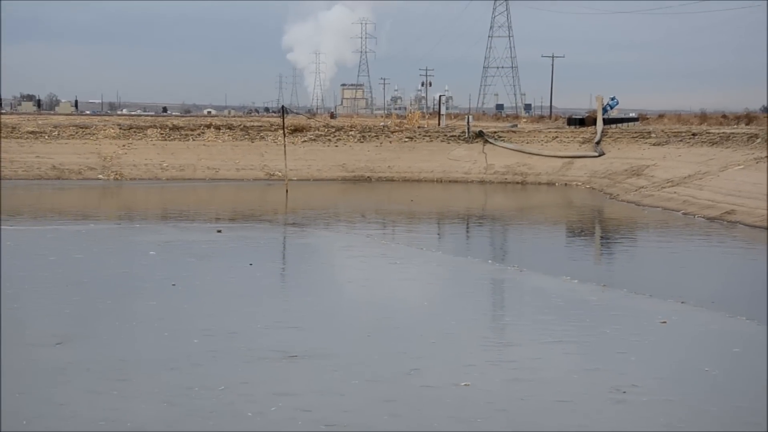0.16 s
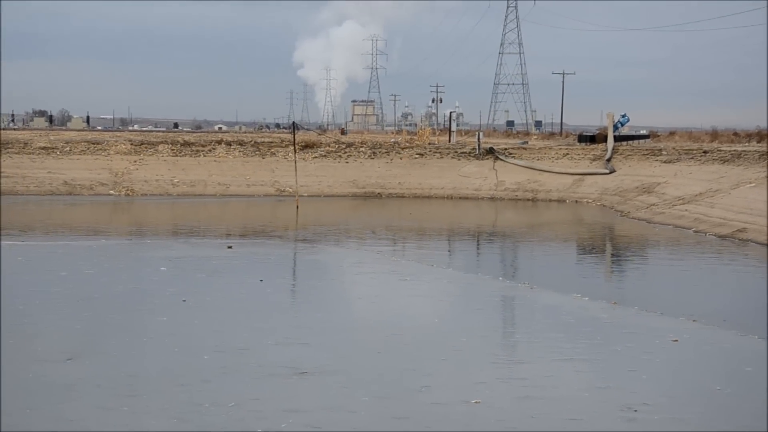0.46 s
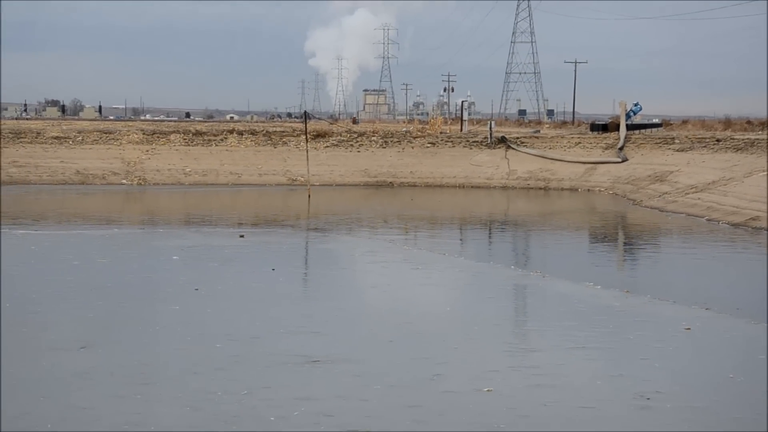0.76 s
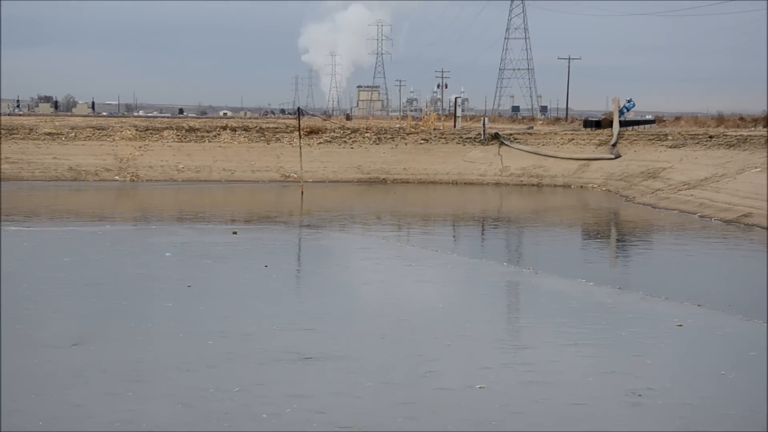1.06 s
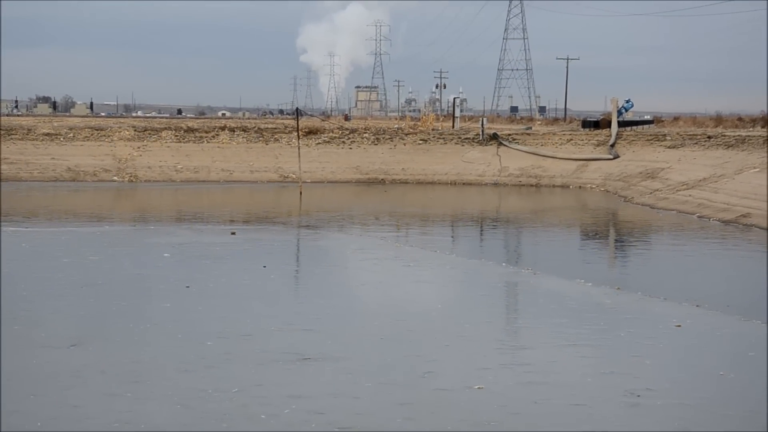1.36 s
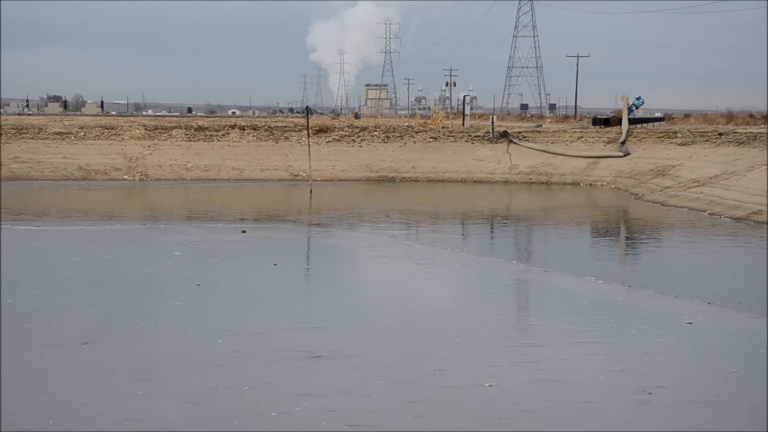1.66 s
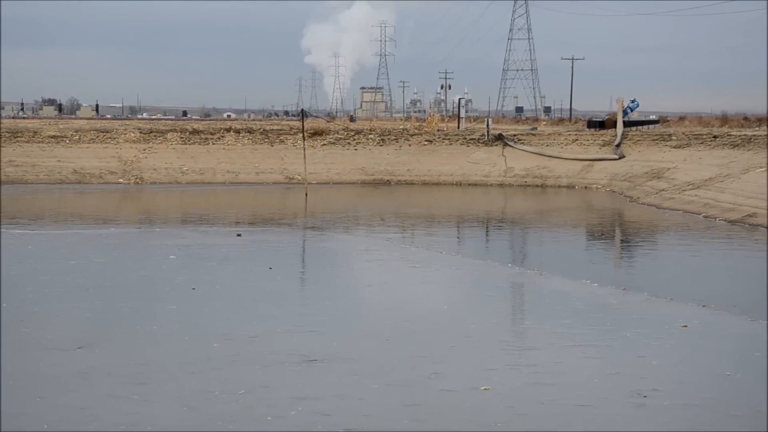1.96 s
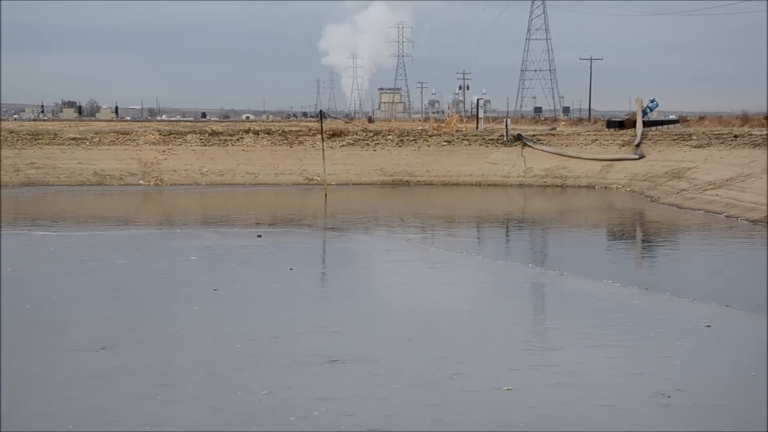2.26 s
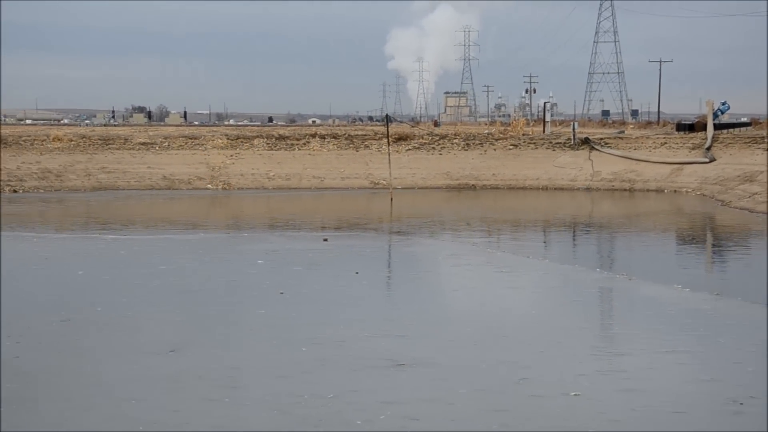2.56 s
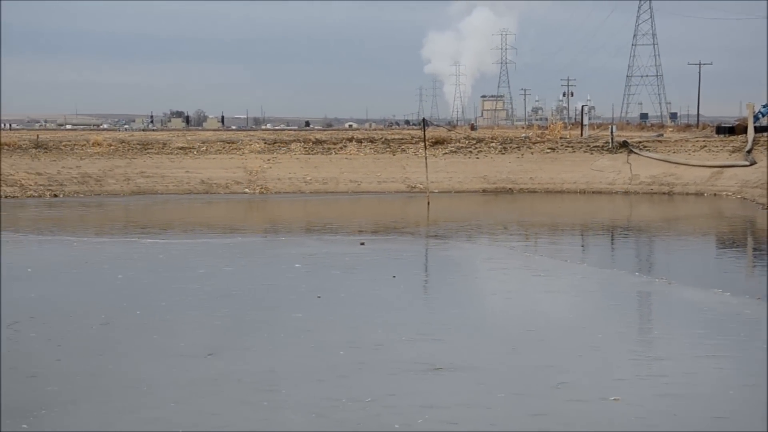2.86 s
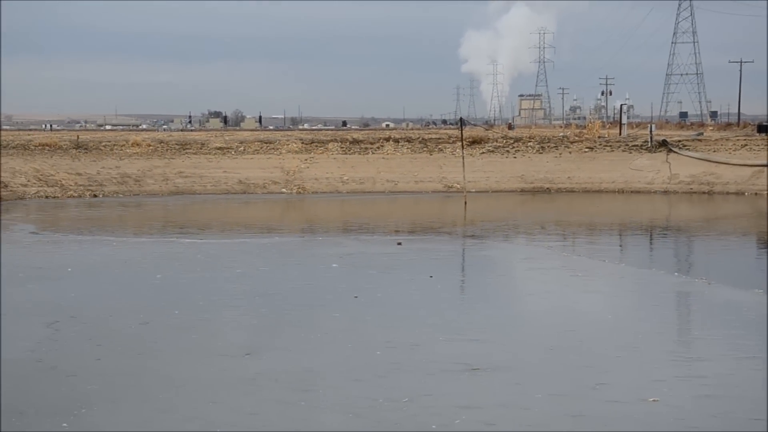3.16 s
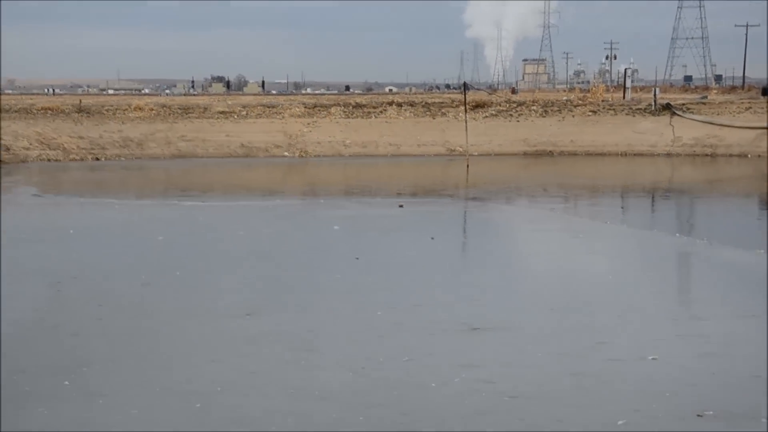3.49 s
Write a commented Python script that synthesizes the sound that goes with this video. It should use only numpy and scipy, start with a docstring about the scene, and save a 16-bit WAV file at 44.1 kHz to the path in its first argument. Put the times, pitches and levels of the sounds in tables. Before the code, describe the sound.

A stone skips away across a frozen pond, ringing out rapid bird-like chirps, then a loud close crack.

```python
"""A stone skips away over a thin frozen pond. Each bounce sends a bending wave through the ice that outruns
the sound in the air: a 2 kHz note and a falling chirp arrive first, and the tick of the contact cuts them off.
Feet shift, a sleeve swishes (thuds and grainy noise), and a second stone cracks onto the ice close by (swept
notes and noise), overloading the microphone. Low rumble and steady distant noise lie under it all."""
import sys
import numpy as np
from scipy import signal
from scipy.fft import rfft, irfft
from scipy.io import wavfile
from scipy.ndimage import map_coordinates

SR = 44100
rng = np.random.default_rng(int(sys.argv[2]) if len(sys.argv) > 2 else 0)


def unload_wav(signal):
    """Save mono or channel-first audio to the path in sys.argv[1] as 16-bit WAV at rate SR, clipped to [-1, 1]."""
    wavfile.write(
        sys.argv[1],
        SR,
        np.round(np.clip(np.atleast_2d(signal).T, -1, 1) * 32767).astype(np.int16),
    )


N = 160083


def amp(db):
    """Decibels to gain."""
    return 10 ** (np.asarray(db) / 20)


def curve(x, table, axis=1):
    """Straight lines through one column of a table."""
    table = np.array(table, float)
    return np.interp(x, table[:, 0], table[:, axis])


def gain_at(hz, points):
    """Gain of a spectrum of (frequency [Hz], level [dB]) points, on a log frequency axis."""
    points = np.array(points, float)
    return amp(np.interp(np.log(np.maximum(hz, 1)), np.log(points[:, 0]), points[:, 1]))


def colour(x, points, keep_power=True):
    """Causal minimum-phase filter with the given spectrum, by folding the cepstrum."""
    size = 4096
    cepstrum = irfft(np.log(gain_at(np.fft.rfftfreq(size, 1 / SR), points)))
    cepstrum[1:size // 2] *= 2
    cepstrum[size // 2 + 1:] = 0
    response = irfft(np.exp(rfft(cepstrum)))
    if keep_power:
        response = response / np.sqrt(np.sum(response ** 2))
    return signal.fftconvolve(x, response)


def noise(points):
    """Steady coloured noise of unit level."""
    return colour(rng.standard_normal(N), points)[:N]


def walk(count, rate_hz):
    """Smooth random drift with a spread near 1."""
    at = np.arange(count) * rate_hz / SR
    knots = rng.standard_normal(int(at[-1]) + 3)
    return map_coordinates(knots, [at], order=2, mode="nearest")


def fade(t60_s):
    """Exponential decay down to -60 dB."""
    t = np.arange(int(t60_s * SR) + 2) / SR
    return np.exp(-np.log(1000) * t / t60_s)


def burst(t60_s):
    """Dying white noise."""
    env = fade(t60_s)
    return env * rng.standard_normal(len(env))


def sine(hz):
    """A tone that follows a pitch curve."""
    return np.sin(2 * np.pi * np.cumsum(hz) / SR)


def add(out, at_s, x):
    """Mix x in from a given time on, trimmed to the scene."""
    i = int(round(at_s * SR))
    x = x[max(-i, 0):max(N - i, 0)]
    out[max(i, 0):max(i, 0) + len(x)] += x


def scatter(x, t60_s):
    """A diffuse noise tail with about the same energy as the sound."""
    tail = burst(t60_s)
    return signal.fftconvolve(x, tail / np.linalg.norm(tail))[:N]


# wind and handling rumble: (time [s], level [dB])
RUMBLE_LEVEL = [(0, -59), (3.039, -56.5), (3.09, -46.5), (3.63, -45)]
# rumble spectrum: (frequency [Hz], level [dB])
RUMBLE_SPECTRUM = [(20, -7.5), (100, 1.5), (220, -3), (600, -22.5), (1500, -51)]
# distant noise spectrum: (frequency [Hz], level [dB])
AIR_SPECTRUM = [(30, -2), (150, 3.5), (400, -4.5), (1500, -11.5), (3000, -22), (4800, -27), (12000, -33.5),
                (16000, -39)]
AIR_DB = -52


def outdoors():
    """Steady distant noise, and a rumble that grows as the hand moves."""
    rumble_db = curve(np.arange(N) / SR, RUMBLE_LEVEL) + 0.77 * walk(N, 10)
    rumble = noise(RUMBLE_SPECTRUM) * amp(rumble_db)
    air = noise(AIR_SPECTRUM) * amp(AIR_DB + .5 * walk(N, 4.3))
    return rumble + air


# ice along the path, thicker ice sings lower: (distance from listener [m], pitch [Hz], level [dB])
ICE_PATH = [(0, 1900, -7), (1, 2030, 3), (2.1, 2080, -6), (3.4, 2110, -1), (12, 2165, 1), (19, 2160, 1),
            (25, 2030, 2), (28, 1930, -1)]
LEAD_S_PER_M = .0017  # gain of the ice wave on the sound in the air
LOSS_DB_PER_M = 0.2767  # damping of the ice wave over that lead
NOTE_WOBBLE, NOTE_ROUGH_DB, NOTE_FUZZ = .012, 1.6, .11  # random pitch, level and fast amplitude


def ice_note(metres, detune):
    """Pitch follows the sheet: ice near the listener sounds first, ice under the stone last."""
    count = int(metres * LEAD_S_PER_M * SR)
    place_m = np.arange(count) / SR / LEAD_S_PER_M
    pitch_hz = curve(place_m, ICE_PATH) * (1 + detune + NOTE_WOBBLE * walk(count, 151.2))
    loss_db = LOSS_DB_PER_M * (metres - place_m)
    level_db = curve(place_m, ICE_PATH, axis=2) - loss_db + NOTE_ROUGH_DB * walk(count, 298.5)
    fuzz = 1 + NOTE_FUZZ * walk(count, 1404.6)
    tone = sine(pitch_hz[::-1])[::-1]  # phase counted back from the tick
    return np.sqrt(2) * amp(level_db) * fuzz * tone, pitch_hz[0]


# chirp spectrum: (frequency [Hz], level [dB])
CHIRP_SPECTRUM = [(750, -22.5), (980, -5.5), (1170, 1), (1380, -7.5), (1580, -21), (1880, -3), (2200, -5)]
CHIRP_DB, CHIRP_PATCHY_DB, CHIRP_ATTACK_S = -9, 3.5, 0.00087
CHIRP_S_PER_M, DISPERSION = .0013, .6  # travel time at its first pitch; speed goes as pitch to this power


def ice_chirp(metres, count, note_hz):
    """Bending waves disperse: high pitches travel faster, so the pitch falls as they arrive."""
    t = np.arange(count) / SR
    falling_hz = note_hz * 1.1 * (1 + t / (metres * CHIRP_S_PER_M)) ** (-1 / DISPERSION)
    level = amp(CHIRP_DB + CHIRP_PATCHY_DB * walk(count, 307)) * gain_at(falling_hz, CHIRP_SPECTRUM)
    return np.sqrt(2) * level * sine(falling_hz) * np.minimum(t / CHIRP_ATTACK_S, 1)


# stone path: (time [s], distance [m], level of the tiny contacts between bounces [dB])
STONE_PATH = [(0, 13.1, -52), (.82, 19, -53), (1.45, 22.8, -50), (2.15, 27, -46), (2.6, 29.5, -50),
              (2.95, 31, -58)]
UNDER_START_HZ, UNDER_END_HZ, UNDER_DB, UNDER_FADE_DB_PER_M = 849, 1037, -7.5, 3


def under_note(metres, count):
    """Lower rising note in the first half of the lead, fading with the stone's distance."""
    half = count // 2
    tone = sine(np.linspace(UNDER_START_HZ, UNDER_END_HZ, half)) * signal.windows.tukey(half, .5)
    level_db = UNDER_DB - UNDER_FADE_DB_PER_M * (metres - STONE_PATH[0][1])
    return np.sqrt(2) * amp(level_db) * np.pad(tone, (0, count - half))


# bounces: (time the tick arrives [s], note level [dB])
STONE_BOUNCES = [(.0303, -31), (.1201, -29.5), (.1733, -35.5), (.2149, -33), (.3156, -28), (.3642, -37),
                 (.4123, -34.5), (.478, -41), (.5012, -38.5), (.528, -41.5), (.6235, -37.5), (.6661, -36.5),
                 (.7287, -37.5), (.8237, -30.5), (.8732, -30.5), (.9374, -37.5), (.9884, -37),
                 (1.0055, -40.5), (1.057, -40), (1.0871, -33), (1.192, -34.5), (1.2043, -34), (1.2687, -42),
                 (1.329, -42), (1.3769, -37.5), (1.4536, -35), (1.6267, -35), (1.6718, -38), (1.7132, -38),
                 (1.7842, -37), (1.808, -40.5), (1.838, -34.5), (1.9164, -37), (1.961, -36.5),
                 (1.9762, -29.5), (1.999, -37.5), (2.1075, -30), (2.121, -33), (2.1685, -32.5),
                 (2.2354, -30), (2.2615, -38.5), (2.3018, -45), (2.435, -38.5), (2.4968, -38), (2.597, -44),
                 (2.6786, -36.5), (2.8176, -38)]
# tick spectrum: (frequency [Hz], level [dB])
TICK_SPECTRUM = [(300, -3), (3000, 11), (4400, -9), (6000, -21), (16000, -48.5)]
TICK_DB = -6  # relative to the note
CONTACT_COUNT, CONTACTS_PER_S, CONTACT_SPREAD_DB, CONTACT_DETUNE = 200, 70, 2, .03
SCATTER_DB, SCATTER_T60_S = -6, .09
BANK_DB, BANK_T60_S = -17, .3


def skipping_stone():
    """Bounces and a patter of contacts, ever farther off; flaws smear the chirps, banks scatter a little."""
    notes, chirps, ticks = np.zeros((3, N))
    for at, db in STONE_BOUNCES:
        add(ticks, at, amp([db + TICK_DB]))
    times = (np.arange(CONTACT_COUNT) + rng.uniform(-1, 1, CONTACT_COUNT)) / CONTACTS_PER_S
    spread_db = CONTACT_SPREAD_DB * rng.standard_normal(CONTACT_COUNT)
    levels_db = curve(times, STONE_PATH, axis=2) + spread_db
    detunes = CONTACT_DETUNE * rng.standard_normal(CONTACT_COUNT)
    calls = [(at, db, 0) for at, db in STONE_BOUNCES] + list(zip(times, levels_db, detunes))
    for at, db, detune in calls:
        metres = curve(at, STONE_PATH)
        note, first_hz = ice_note(metres, detune)
        count = len(note)
        chirp = ice_chirp(metres, count, first_hz) + under_note(metres, count)
        start_s = at - count / SR  # ends at the contact's arrival in air
        add(notes, start_s, amp(db) * note)
        add(chirps, start_s, amp(db) * chirp)
    direct = notes + chirps + colour(ticks, TICK_SPECTRUM)[:N]
    smear = amp(SCATTER_DB) * scatter(chirps, SCATTER_T60_S)
    return direct + smear + amp(BANK_DB) * scatter(direct, BANK_T60_S)


# ticks of grit and clothing: (time [s], level [dB])
GRIT_TICKS = [(.197, -46), (1.703, -33), (1.836, -39), (2.133, -34.5), (3.154, -24), (3.571, -32.5)]
# grit spectrum: (frequency [Hz], level [dB])
GRIT_SPECTRUM = [(500, -10), (2000, 4), (4200, -1), (7000, -4.5), (11000, -18), (16000, -23)]
GRIT_T60_S = 0.0041


def grit_ticks():
    """Very short noise bursts, coloured."""
    grit = np.zeros(N)
    for at, db in GRIT_TICKS:
        add(grit, at, amp(db) * burst(GRIT_T60_S))
    return colour(grit, GRIT_SPECTRUM)[:N]


# rustle of the thrower's clothes: (time [s], level [dB])
RUSTLE_LEVEL = [(1.6, -79), (1.85, -59.5), (2.05, -68), (2.6, -64), (2.79, -51.5), (2.845, -51),
                (2.86, -39), (2.94, -57), (3.28, -55.5), (3.588, -59.5), (3.625, -35)]
# cloth spectrum: (frequency [Hz], level [dB])
CLOTH_SPECTRUM = [(200, 5), (500, 3.5), (1500, 3), (3000, 0.5), (4500, -2), (7000, -5.5), (9500, -12.5),
                  (12000, -20.5), (16000, -21)]
CLOTH_GRAIN_DB, CRACKLES_PER_S, CRACKLE_DB = 3.5, 150, 13


def sleeve():
    """Rubbing cloth: noise with a grainy level and random single-sample crackles."""
    crackle = amp(CRACKLE_DB) * (rng.random(N) < CRACKLES_PER_S / SR)
    level_db = curve(np.arange(N) / SR, RUSTLE_LEVEL) + CLOTH_GRAIN_DB * walk(N, 400)
    rub = rng.standard_normal(N) * (1 + crackle) * amp(level_db)
    return colour(rub, CLOTH_SPECTRUM)[:N]


# feet and hands: (time [s], level [dB], centre [Hz], t60 [s])
SOFT_THUDS = [(2.623, -30.5, 560, 0.048), (2.783, -36, 504, .04), (2.879, -28, 424, 0.025),
              (3.457, -33.5, 446, 0.034), (3.481, -26.5, 209.7, .12), (3.482, -31.5, 657, .06)]
THUD_ATTACK_S = 0.0012


def feet_and_hands():
    """Dull thuds: a decaying tone plus a noise scuff around the same centre."""
    thuds = np.zeros(N)
    for at, db, hz, t60_s in SOFT_THUDS:
        env = fade(t60_s)
        env = env * np.minimum(np.arange(len(env)) / SR / THUD_ATTACK_S, 1)
        scuff = colour(burst(t60_s), [(hz / 4, -12), (hz, 0), (hz * 2, -9), (hz * 20, -62)])
        add(thuds, at, amp(db) * env * sine(np.full(len(env), hz)))
        add(thuds, at, amp(db - 3) * scuff)
    return thuds


# short notes of the close strike: (time [s], length [s], start [Hz], end [Hz], level [dB])
STRIKE_NOTES = [(3.1552, 0.00577, 1700, 2570, 1.5), (3.1556, 0.00453, 1647, 1072, -3.5),
                (3.1584, .0026, 4070, 3700, -9), (3.1606, .0085, 1224, 730, -12.5)]
# crack spectrum: (frequency [Hz], level [dB])
CRACK_SPECTRUM = [(60, -8), (250, -7.5), (700, 4), (2000, -5), (4000, -3.5), (7000, -19), (16000, -44)]
# sheet ring spectrum: (frequency [Hz], level [dB])
RING_SPECTRUM = [(200, -23), (1300, 5.5), (2200, 5), (3200, -11), (16000, -46)]
# echoes from the pond edges: (time [s], length [s], centre [Hz], level [dB])
EDGE_ECHOES = [(3.169, 0.0084, 1800, -26), (3.186, .014, 2000, -28.5), (3.17, 0.16, 1370, -44.5),
               (3.262, 0.024, 1330, -35.5)]
STRIKE_S = 3.156
CRACK_DB, CRACK_T60_S = -12, 0.031
RING_DB, RING_T60_S = -23.5, .2


def close_strike():
    """So near that note and chirp shrink to a few cycles in a crack; the sheet rings, its edges answer."""
    out = np.zeros(N)
    for at, length_s, start_hz, end_hz, db in STRIKE_NOTES:
        count = int(length_s * SR)
        sweep = sine(np.geomspace(start_hz, end_hz, count))
        add(out, at, amp(db) * signal.windows.tukey(count, .7) * sweep)
    add(out, STRIKE_S, amp(CRACK_DB) * colour(burst(CRACK_T60_S), CRACK_SPECTRUM))
    add(out, STRIKE_S, amp(RING_DB) * colour(burst(RING_T60_S), RING_SPECTRUM))
    for at, length_s, hz, db in EDGE_ECHOES:
        count = int(length_s * SR)
        tone = sine(hz * (1 + 0.11 * walk(count, 700)))
        add(out, at, amp(db) * np.hanning(count) * tone * np.sqrt(2))
    return out


def scene():
    """Everything at one microphone."""
    thrower = grit_ticks() + sleeve() + feet_and_hands()
    return (outdoors() + skipping_stone() + thrower + close_strike())[None]


# microphone in its housing: (frequency [Hz], level [dB])
MIC_RESPONSE = [(20, 2), (5200, -2.5), (5700, -10.5), (6300, -3.5), (6900, -7.5), (7600, -6),
                (16000, -14.5)]
TOP_HZ = 15900


def record(dry):
    """The housing notches the treble, the close strike clips, and the top is cut."""
    heard = colour(dry[0], MIC_RESPONSE, keep_power=False)[:N]
    clipped = np.clip(heard, -1, 1)
    top_cut = signal.ellip(8, .2, 70, TOP_HZ, fs=SR, output="sos")
    return signal.sosfilt(top_cut, clipped)[None]


dry = scene()
out = record(dry)
unload_wav(out)
```